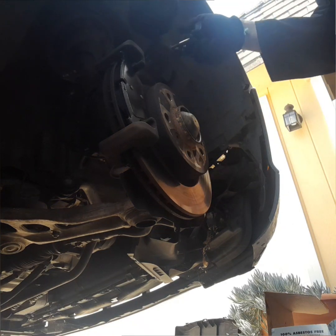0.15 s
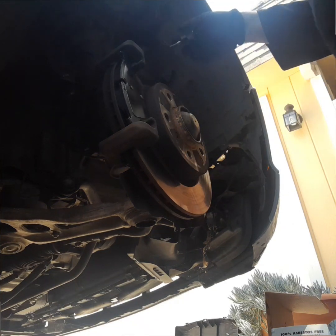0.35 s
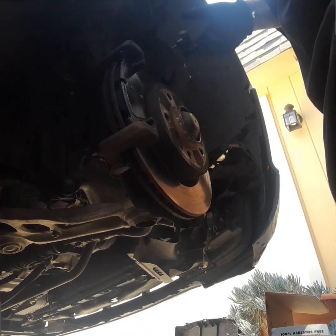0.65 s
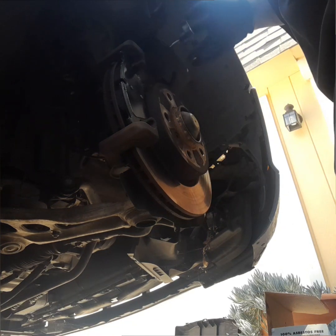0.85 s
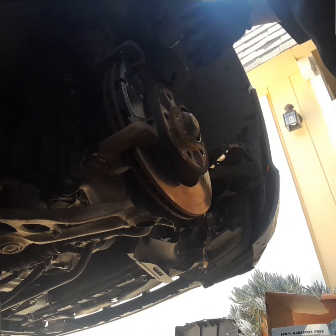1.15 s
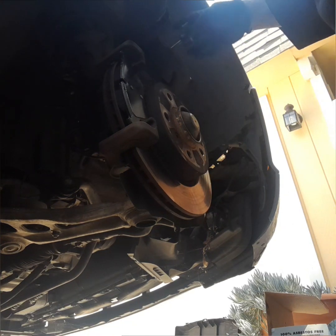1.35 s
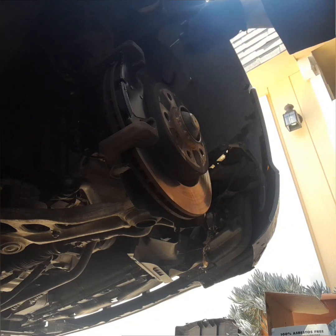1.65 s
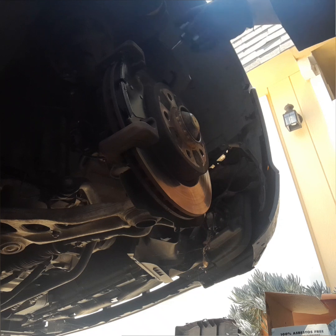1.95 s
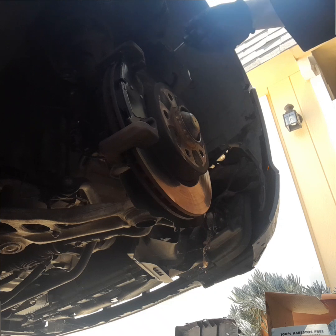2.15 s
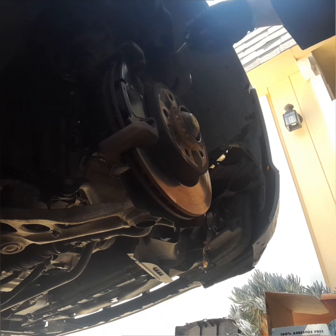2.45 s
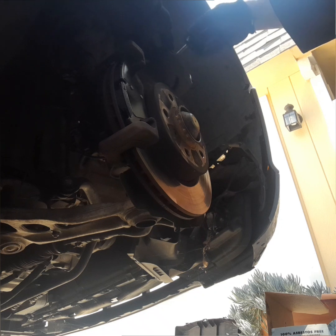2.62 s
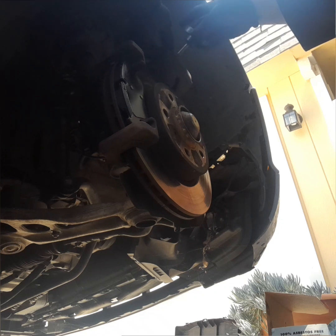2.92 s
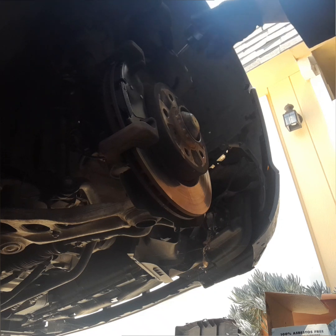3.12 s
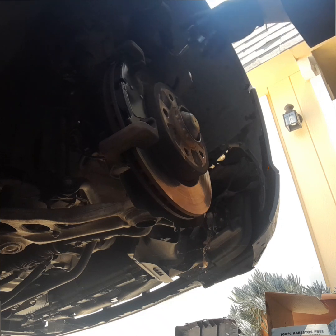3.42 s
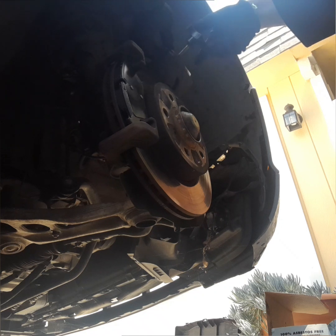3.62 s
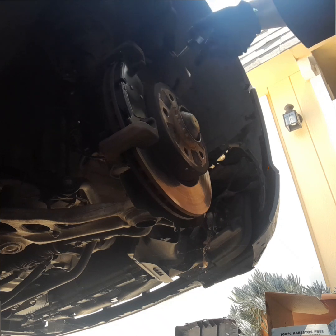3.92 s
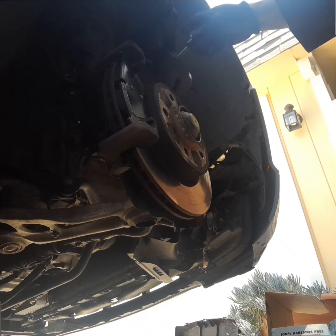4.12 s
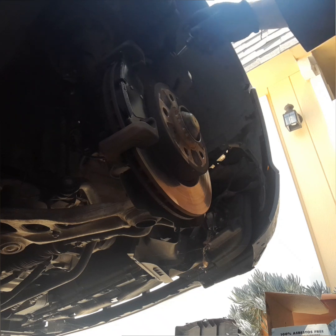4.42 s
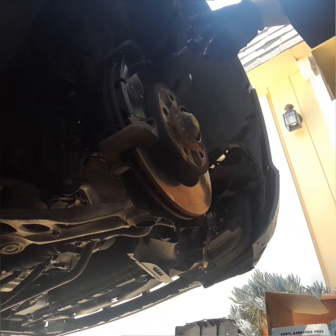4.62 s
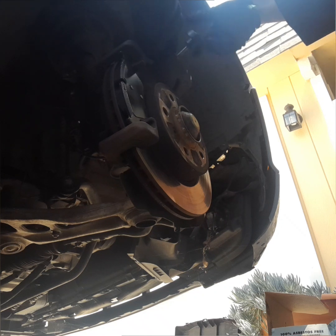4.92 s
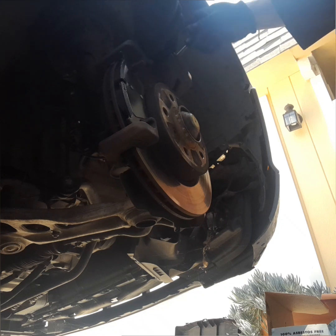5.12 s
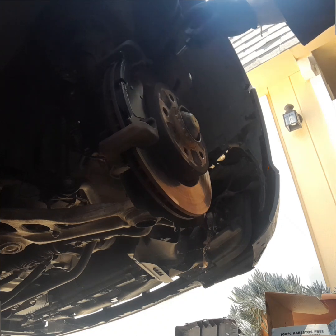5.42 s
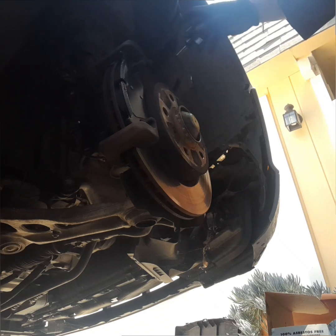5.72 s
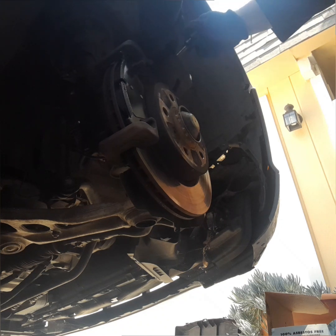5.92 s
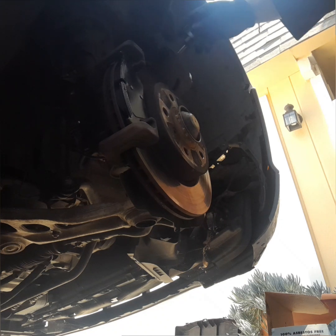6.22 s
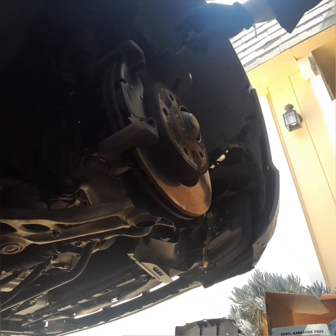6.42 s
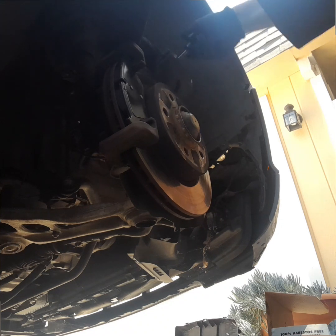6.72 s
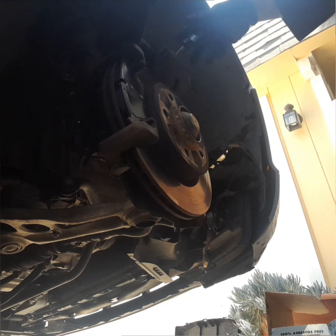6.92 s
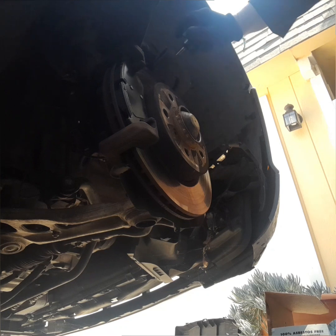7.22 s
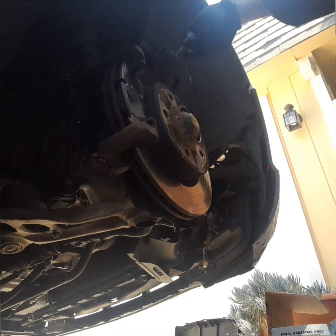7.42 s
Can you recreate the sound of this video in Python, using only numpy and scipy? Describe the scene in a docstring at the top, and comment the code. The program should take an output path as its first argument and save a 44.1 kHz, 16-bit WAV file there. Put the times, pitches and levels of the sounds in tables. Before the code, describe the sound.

A close microphone by a car's front brake catches hands at work. A tool drags and rattles over the ground within the first second. Small dry steel clicks follow, some with faint pad chatter, leading to a very loud sharp crack and several strong follow-ups. Later clicks weaken and loose metal knocks dully. Low outdoor rumble and soft sleeve rustling lie beneath; no speech.

```python
"""Work on a car's front brake, heard from under the wheel arch, outdoors, over a low rumble throughout. Faint
caliper clicks and a sleeve brush come first; at 0.4-0.8 s a steel tool scrapes and clatters on the ground.
Caliper clicks, each a coloured noise crack plus decaying modes, peak in a hard pair at 3.3 s and then thin out.
Each shakes suspension and panels (low modes); pads chatter by filtered noise from 1.8 to 5.5 s. Hollow clunks
of the body panels, one at 0.3 s, gather from 4.9 s to the end; sleeves rustle as grainy noise."""
import sys
import numpy as np
from scipy import signal
from scipy.fft import rfft, irfft, next_fast_len
from scipy.io import wavfile
from scipy.ndimage import map_coordinates

SR = 44100
rng = np.random.default_rng(int(sys.argv[2]) if len(sys.argv) > 2 else 0)


def transcribe(signal):
    """Save signal, clipped to [-1, 1], as a 16-bit WAV file at the path in sys.argv[1]."""
    frames = np.atleast_2d(signal).T
    limited = np.clip(frames, -1, 1)
    pcm = np.round(limited * 32767).astype(np.int16)
    wavfile.write(sys.argv[1], SR, pcm)


N = 332955

# Levels in the tables are relative; t60 and rise are nominal.
# caliper contacts: t/s, click level/dB, low clank re click/dB, mid clink re click/dB, t60/s
CONTACTS = [(0.0887, -39, -6.5, -10, 0.11), (0.3147, -27.5, -5.5, -2, 0.073),
            (0.431, -27.5, -18, -21, 0.024), (0.7709, -26, -12, -7.5, 0.024),
            (0.7939, -27.5, -34, -27, 0.053), (0.842, -32.5, -7.5, -11, .044),
            (0.9011, -45, -4.5, -7, 0.022), (1.3013, -33, -23.5, -4.5, 0.022),
            (1.7505, -37, -28, -35.5, 0.053), (1.8079, -29.5, -28.5, -26.5, 0.06),
            (1.8344, -40, -21, -20.5, 0.031), (2.0144, -30, -30, -22.5, .039),
            (2.076, -27.5, -25.5, -22.5, 0.031), (2.2525, -41, -31, -22.5, 0.049),
            (2.408, -20.5, -21.5, -18, 0.053), (2.7205, -22, -16.5, -14, 0.061),
            (2.768, -44.5, -11, -20, 0.16), (3.0207, -37, -18, -12, 0.093),
            (3.0604, -39, -12, -16.5, 0.071), (3.0757, -37, -22, -13, .042), (3.3129, -5, -26, -12, 0.061),
            (3.3207, -12.5, -20.5, -20, 0.08), (3.6126, -12, -20, -12.5, 0.072),
            (3.6686, -24.5, -15.5, -11, .055), (3.8923, -28.5, -12.5, -16, 0.087),
            (4.1616, -25, -20, -26, .07), (4.2727, -21, -15, -6.5, 0.068),
            (4.4907, -43.5, -20, -27.5, 0.054), (4.7943, -17.5, -33.5, -27.5, 0.057),
            (4.8101, -36.5, -9.5, -17, 0.13), (4.8464, -37.5, -7, -12.5, 0.077),
            (4.8623, -15, -28.5, -21.5, 0.046), (5.034, -36.5, -28, -26.5, .037),
            (5.1361, -43, -17.5, -22, 0.17), (5.2641, -36, -9, -24, 0.059),
            (5.2919, -43.5, -13, -10.5, 0.058), (5.457, -44, -3, -10, 0.088),
            (5.8539, -54, -14, -25, 0.072), (6.147, -45, -30.5, -38, .068),
            (6.2164, -43, -28.5, -15, 0.089), (6.4265, -45.5, -24.5, -16, 0.075),
            (6.4593, -39.5, -29.5, -20, .057), (6.5953, -47.5, 4, -3, 0.084), (7.438, -55, -15, -3, 0.13)]
# caliper and disc modes: f/Hz, level/dB, t60/s
CALIPER_MODES = [(403, -14, .16), (834, -17, .32), (880, -18, .2), (1130, -9, .17), (1370, -12, .12),
                 (1435, -10, .14), (1577, -8, .18), (1617, -11, .17), (1760, -10, .13), (2010, -14, .13),
                 (2580, -12, .13), (2790, -14, .13), (3380, -16, .12), (3840, -11, .13), (4670, -12, .12),
                 (6280, -10, .1), (7550, -11, .1)]
# steel contact spectrum: f/Hz, density level/dB
STEEL_SPECTRUM = [(150, -3.5), (400, 1.5), (600, -5.5), (800, 1), (1000, -4.5), (1500, 2), (2700, 3),
                  (3600, -5), (4600, 2.5), (7400, -1), (9500, -5), (11700, -18.5), (13500, -13.5),
                  (15800, -12.5)]
# left-right lean of the brake: f/Hz, L-R level/dB
BRAKE_LEAN = [(100, -2.5), (700, 3.5), (1300, -3), (4400, 4), (8000, -0.5), (15000, 4)]
# thin spring clip modes: f/Hz, level/dB, t60/s
SPRING_MODES = [(14992, 0, .27), (15040, -8, .14)]
# clunks of the body panels: t/s, clunk level/dB, suspension boom level/dB, rise/s
CLUNKS = [(0.319, -40.5, -53, .003), (4.859, -45.5, -50.5, 0.0045), (6.204, -63, -42, 0.0049),
          (6.526, -51, -34, 0.0076), (6.589, -34.5, -33, 0.0043), (6.616, -39.5, -32.5, 0.0014),
          (6.81, -44.5, -42, 0.0087), (6.845, -37, -41, 0.0025), (7.441, -47, -32, 0.004),
          (7.488, -57, -34.5, 0.0037)]
# hollow modes of the body panels: f/Hz, level/dB, t60/s
HOLLOW_MODES = [(280, -3, .17), (400, -7, .14), (665, -1, .15), (720, -5, .11), (770, 0, .17),
                (835, -3, .24), (900, -5, .12), (990, -6, .11), (1146, -2, .17), (1240, -9, .1),
                (1630, -11, .13)]
# clunk rattle spectrum: f/Hz, density level/dB
RATTLE_SPECTRUM = [(150, -2.5), (350, 3.5), (520, -5), (750, 5.5), (1150, -2.5), (1400, -9.5), (1700, -12),
                   (2800, -23), (6000, -37)]
# pads chattering as they slide: t/s, level/dB, length/s
SLIDES = [(1.843, -67, .15), (2.263, -61, 0.12), (4.2, -62.5, 0.11), (5.038, -55, 0.023),
          (5.139, -43, 0.012), (5.189, -55, 0.027), (5.283, -48.5, 0.033), (5.465, -38.5, 0.011)]
# pad backing-plate modes: f/Hz, level/dB, t60/s
PAD_MODES = [(1139, 0, 0.068), (1361, -5, 0.027)]
# suspension and body-panel modes: f/Hz, level/dB, t60/s
CHASSIS_MODES = [(92, -11, .35), (120, -6, .34), (144, -1, .38), (188, -15, .25), (208, -16, .22),
                 (280, -13, .2), (400, -11, .18)]
# tool dragged over the ground: t/s, friction level/dB, brightness/dB
DRAG = [(0.44, -54.5, -1), (0.53, -43.5, -3), (0.538, -35.5, -16), (0.624, -18, -2), (0.644, -23.5, 2.5),
        (0.722, -22, -5), (0.74, -22.5, -5.5), (0.756, -40.5, 0.5), (0.77, -43, -5.5)]
# tool knocks on the ground: t/s, clink level/dB, knock level/dB
BUMPS = [(.539, -29.5, -44), (.548, -30, -29.5), (0.578, -23.5, -36.5), (0.598, -17, -32),
         (0.617, -21.5, -31), (0.6249, -15.5, -24.5), (0.633, -23.5, -12.5), (.654, -18, -32.5),
         (0.6818, -19.5, -14), (0.7023, -11, -21), (0.717, -10.5, -13), (.752, -42.5, -22.5)]
# ringing modes of the tool: f/Hz, level/dB, t60/s
TOOL_MODES = [(2498, -4, .06), (2789, -9, .05), (3510, -6, .08), (4180, -3, .07), (4320, -2, .05),
              (4535, -1, .06), (5823, 0, .08), (6280, 0, .07), (7703, -2, .1), (8096, -6, .12),
              (8274, -1, .06), (8753, -2, .08), (9353, 1, .13), (10578, -1, .11), (11280, -5, .07),
              (12230, -2, .07), (14625, -3, .11)]
# low bending modes of the tool: f/Hz, level/dB, t60/s
BENDING_MODES = [(268, -8, .2), (531, -2, .15), (554, -2, .15), (609, -2, .14), (645, 0, .15),
                 (666, 0, .15), (715, -2, .1)]
# grit under the tool, spectrum: f/Hz, density level/dB
GRIT_SPECTRUM = [(120, -35.5), (200, -5.5), (359, -6.5), (644, -13.5), (1220, -3.5), (3460, -2.5),
                 (4900, -9), (6000, -10.5), (6810, -16.5), (7890, -11), (10000, -22.5), (14700, -17),
                 (15800, -35.5)]
# fine grit hiss, spectrum: f/Hz, density level/dB
HISS_SPECTRUM = [(3500, -30), (5200, -10.5), (6400, -0.5), (8500, -4), (10500, -4.5), (15000, -5.5)]
# ground knock spectrum: f/Hz, density level/dB
GROUND_SPECTRUM = [(50, -10), (90, -7.5), (170, -9), (260, -0.5), (400, -9), (540, 7.5), (670, -2),
                   (900, 0.5), (1500, -10), (3000, -24), (8000, -73.5)]
# left-right lean of the tool: f/Hz, L-R level/dB
TOOL_LEAN = [(100, 3.5), (600, 6.5), (1300, 3), (4000, 4), (8000, 8.5), (15000, 11)]
# wheel-arch reverberation: f/Hz, t60/s
ARCH_DECAY = [(150, 0.71), (800, 0.16), (2000, 0.19), (6000, 0.04), (15000, 0.11)]
# background course: t/s, rumble level/dB, handling level/dB
BACKGROUND = [(0.0, -67.5, -76.5), (0.08, -58, -76.5), (0.48, -50, -51), (0.69, -44.5, -48.5),
              (0.88, -59.5, -59), (1.49, -71.5, -81), (2.25, -54.5, -64), (3.11, -54, -76),
              (3.59, -54, -64), (4.22, -53, -78), (4.33, -53, -72.5), (4.84, -53, -79), (5.03, -51.5, -67),
              (5.74, -52.5, -70), (6.14, -51, -69.5), (6.75, -46.5, -58), (7.04, -51.5, -77),
              (7.55, -55, -73.5)]
# a sleeve brushes past: t/s, level/dB, length/s
BRUSHES = [(0.284, -52, 0.065), (1.082, -72.5, 0.026), (1.194, -49, 0.028), (1.8, -60.5, .04),
           (3.027, -60, 0.032), (4.575, -64.5, 0.054), (6.387, -69.5, 0.23), (6.87, -64.5, 0.15),
           (6.955, -55.5, 0.017)]
# outdoor rumble spectrum: f/Hz, density level/dB
RUMBLE_SPECTRUM = [(15, -41), (25, -14), (59, 4.5), (108, -4), (141, -0.5), (167, -7), (200, -5),
                   (226, -9.5), (291, -12.5), (334, -19.5), (406, -21), (700, -37.5), (910, -54.5),
                   (1540, -120)]
# handling shuffle spectrum: f/Hz, density level/dB
SHUFFLE_SPECTRUM = [(200, -6.5), (400, -4), (800, -1), (1000, -12), (1150, -4.5), (1500, -15.5),
                    (2500, -21), (5000, -36)]
# sleeve rustle spectrum: f/Hz, density level/dB
SLEEVE_SPECTRUM = [(1000, -9), (2500, -1), (4500, -4), (7600, 1), (10500, -6.5), (15500, -2.5)]
# left-right likeness: f/Hz, correlation
ALIKE = [(60, .92), (150, .93), (350, .68), (700, .42), (1300, -.5), (2500, -.12), (6000, -.08),
         (15000, .05)]

# contacts with more clank than BLUNT_FROM_DB excite the lower mode cluster
BLUNT_FROM_DB, BLUNT_RING_HZ, SHARP_RING_HZ = -12, 2350, 7400
RING_DB, RING_HALF_WIDTH_HZ, RING_SCATTER = 5.5, 260, 0.032  # cluster lift; scatter is relative
EDGE_DB, EDGE_DB_PER_DB = 8, 0.26  # 13 kHz edge at 0 dB clink; growth with clink
RATTLE_KNOTS_PER_S, RATTLE_DEPTH_DB = 170, 2.5  # loose parts chatter in the tail of each blow
TICK_DB, TICK_HALF_RANGE_DB = 23, 1  # stray ticks of loose parts, re sleeve rustle
TICK_CLANK_DB, TICK_CLINK_DB, TICK_T60_S = -19, -22.5, 0.057
SPRING_DB, SPRING_DB_PER_DB = -24.5, 2.2  # ring at the hardest blow; loss per dB softer
BLOW_BOOM_DB, BUMP_BOOM_DB, CLUNK_BOOM_DB = -22, -23, 2.5  # re click, tool knock, CLUNKS boom column
BOOM_LAG_S = 0.004
DRAG_DB, DRAG_BRIGHT_DB, HISS_DB = -2.5, 1.5, -3  # offsets to DRAG: grit, brightness, hiss
DRAG_ATTACK_S, DRAG_LIFT_S, DRAG_RELEASE_S = 0.015, 0.738, 0.017  # ramp, lift-off time, time constant
SLIP_KNOTS_PER_S, SLIP_DEPTH_DB = 160, 2.5  # the tool catches and lets go unevenly
RUMBLE_DB, SHUFFLE_DB = 2, 2  # offsets to BACKGROUND
SLEEVE_DB, SLEEVE_DB_PER_DB = -72.5, 0.65  # rustle at average handling; growth with handling
BRUSH_BODY_DB = -4  # shuffle of a brushing sleeve, re its rustle
SETTLE_RISE_S, SETTLE_T60_S, SETTLE_DB_PER_DB = 0.04, 0.33, 0.53  # hands and parts settle after a blow
SETTLE_SHUFFLE_DB, SETTLE_SLEEVE_DB = -58.5, -57.5  # after the hardest blow
TOP_HZ = 15850


def caliper():
    """Each contact makes a dense short steel crack, a rattling tail and longer modes; the arch answers."""
    cracks, rings = np.zeros((2, N)), np.zeros((2, N))
    t = np.arange(SR // 3) / SR
    casting = uneven(noise(STEEL_SPECTRUM, len(t)), depth_db=6.5, spacing_hz=84.6)  # shared by all blows
    chatter = unit(amp(RATTLE_DEPTH_DB * wobble(RATTLE_KNOTS_PER_S)))
    for s, db, clank_db, clink_db, t60_s in CONTACTS + stray_ticks(count=18):
        # blunt blows are strong in the low modes, sharp ones in the high modes
        colour = [(200, clank_db + 18), (1500, clank_db + 14.5), (3500, clink_db + 13.0),
                  (7000, -1.3), (13000, EDGE_DB + EDGE_DB_PER_DB * clink_db)]
        # the point of contact favours one cluster of modes
        centre_hz = BLUNT_RING_HZ if clank_db > BLUNT_FROM_DB else SHARP_RING_HZ
        ring_hz = centre_hz * np.exp(RING_SCATTER * rng.standard_normal())

        def contact_gain(hz):
            """Colour plus the favoured cluster."""
            cluster_db = RING_DB / (1 + ((hz - ring_hz) / RING_HALF_WIDTH_HZ) ** 2)
            return amp(along(colour, hz) + cluster_db)

        own = uneven(noise(STEEL_SPECTRUM, len(t)), depth_db=5.0, spacing_hz=96.3)
        crowd = filtered(0.91 * casting + 0.8 * own, contact_gain)
        modes = [(hz, level_db + along(colour, hz), life_s) for hz, level_db, life_s in CALIPER_MODES]
        tones = ring(modes, t, scatter_db=3.5) * (1 - np.exp(-t / 0.0028))
        crack = crowd * fade(t, 0.0039, 0.56 * t60_s)
        add(cracks, s - 0.0008, amp(db - 9.5) * crack)
        freedom = (t60_s / 0.068) ** 0.79  # a part held tight dies fast and hardly rings on
        chatter_here = np.roll(chatter, -round(s * SR))[:len(t)]
        rattle = amp(-6.5) * crowd * fade(t, 0.037, 1.44 * t60_s) * chatter_here
        add(rings, s - 0.0008, freedom * amp(db - 11.5) * (rattle + tones))
    return placed(cracks + rings, BRAKE_LEAN) + amp(-13) * arch(rings)


def stray_ticks(count):
    """Faint contacts of loose parts at random times, stronger while the hands are busy."""
    sleeve_db = rustle_db()
    ticks = []
    for when, size in rng.random((count, 2)):
        db = sleeve_db[int(when * N)] + TICK_DB + TICK_HALF_RANGE_DB * (2 * size - 1)
        ticks.append((when * N / SR, db, TICK_CLANK_DB, TICK_CLINK_DB, TICK_T60_S))
    return ticks


def spring():
    """A thin clip rings near 15 kHz; its level falls faster than that of the blow."""
    out, t = np.zeros((2, N)), np.arange(SR // 3) / SR
    hardest_db = max(db for _, db, *_ in CONTACTS)
    for s, db, *_ in CONTACTS:
        level_db = SPRING_DB + SPRING_DB_PER_DB * (db - hardest_db)
        tones = ring(SPRING_MODES, t, scatter_db=0) * (1 - np.exp(-t / 0.003))
        add(out, s, amp(level_db) * tones)
    return out


def clunks():
    """Blunt knocks wake only the low, hollow modes, with a short noise rattle."""
    out, t = np.zeros((2, N)), np.arange(SR // 3) / SR
    for s, db, _, rise_s in CLUNKS:
        tones = ring(HOLLOW_MODES, t, scatter_db=3.0) * (1 - np.exp(-t / rise_s))
        rattle = uneven(noise(RATTLE_SPECTRUM, len(t)), depth_db=4, spacing_hz=50) * fade(t, rise_s, 0.17)
        add(out, s, amp(db) * (tones + amp(-3.5) * rattle))
    return out + amp(-6.5) * arch(out)


def pads():
    """Stick and slip, as a swelling noise force, makes the pads' backing plates sound."""
    pressure = sum(swell(s, db, length_s) for s, db, length_s in SLIDES)
    return resonate(pressure * rng.standard_normal((1, N)), PAD_MODES, scatter_db=0)


def chassis():
    """Each caliper click, tool knock and clunk makes suspension and panels boom in proportion."""
    out, t = np.zeros((2, N)), np.arange(SR // 2) / SR
    blows = [(s, db + BLOW_BOOM_DB) for s, db, *_ in CONTACTS]
    blows += [(s, db + BUMP_BOOM_DB) for s, _, db in BUMPS]
    blows += [(s, db + CLUNK_BOOM_DB) for s, _, db, _ in CLUNKS]
    for s, db in blows:
        boom = ring(CHASSIS_MODES, t, scatter_db=2.5) * (1 - np.exp(-t / 0.0046))
        add(out, s + BOOM_LAG_S, amp(db) * boom)
    return out * amp([[0.7], [-0.7]])


def tool():
    """Grit catches and slips under the dragged tool; slips ring its steel, bumps make it bend."""
    friction_db, bright_db = curves(DRAG)
    now, t = np.arange(N) / SR, np.arange(SR // 4) / SR
    bite = np.clip((now - DRAG[0][0]) / DRAG_ATTACK_S + 1, 0, 1)
    release = np.exp(-np.maximum(now - DRAG_LIFT_S, 0) / DRAG_RELEASE_S)
    touching = bite * release * unit(amp(SLIP_DEPTH_DB * wobble(SLIP_KNOTS_PER_S)))
    grit = noise(GRIT_SPECTRUM, N)
    fine = filtered(grit, lambda hz: 1 / (1 + (5000 / (hz + 1)) ** 4))  # above about 5 kHz
    coloured = grit + (amp(bright_db + DRAG_BRIGHT_DB) - 1) * fine
    grain = unit(amp(2.2 * wobble(800)))
    force = coloured * touching * amp(friction_db + DRAG_DB) * grain
    knocks = np.zeros((2, N))
    for s, clink_db, knock_db in BUMPS:
        clink = uneven(noise(GRIT_SPECTRUM, len(t)), depth_db=4.5, spacing_hz=203.0)
        add(force, s, amp(clink_db) * clink * fade(t, 0.00035, 0.043))
        knock = noise(GROUND_SPECTRUM, len(t)) * fade(t, 0.00033, 0.037)
        add(knocks, s, amp(knock_db - 3.5) * knock)
    hiss = amp(friction_db + bright_db + HISS_DB) * touching * noise(HISS_SPECTRUM, N)
    clatter = amp(-1) * force + amp(-2.5) * resonate(force, TOOL_MODES) + hiss
    bending = amp(-14.5) * resonate(knocks, BENDING_MODES)
    return placed(clatter + knocks + bending, TOOL_LEAN)


def arch(x):
    """The wheel arch and ground answer with a noise tail whose decay time depends on frequency."""
    hz, t, z = signal.stft(noise([(100, 0), (15000, 0.003)], SR // 2), SR, nperseg=256)
    decay = np.exp(-np.log(1000) * t / along(ARCH_DECAY, hz)[:, None])
    tail = signal.istft(z * decay, SR, nperseg=256)[1]
    tail = tail * (1 - np.exp(-np.arange(tail.shape[1]) / SR / 0.008))
    return signal.fftconvolve(x, tail / np.linalg.norm(tail[0]), axes=1)[:, :N]


def background():
    """Low outdoor rumble, soft shuffling and grainy sleeve rustle, all as shaped noise."""
    rumble_db, handling_db = curves(BACKGROUND)
    unsteady_db = 1.5 * wobble(12)
    rumble = amp(rumble_db + RUMBLE_DB + unsteady_db) * noise(RUMBLE_SPECTRUM, N)
    shifting = amp(SETTLE_SHUFFLE_DB) * settling([(s, db + clank_db) for s, db, clank_db, *_ in CONTACTS])
    brushing = sum(swell(s, db, length_s) for s, db, length_s in BRUSHES)
    moving = np.hypot(amp(handling_db + SHUFFLE_DB), shifting + amp(BRUSH_BODY_DB) * brushing)
    shuffle = moving * amp(1.0 * wobble(33)) * noise(SHUFFLE_SPECTRUM, N)
    recoil = amp(SETTLE_SLEEVE_DB) * settling([(s, db) for s, db, *_ in CONTACTS])
    rubbing = np.hypot(amp(rustle_db()), recoil) + brushing
    grain = amp(2.0 * wobble(30) + 1.7 * wobble(400))
    sleeve = rubbing * grain * noise(SLEEVE_SPECTRUM, N)
    return (rumble + shuffle + sleeve) * amp([[0.5], [-0.5]])


def rustle_db():
    """Sleeves rustle more as the handling gets busier."""
    _, handling_db = curves(BACKGROUND)
    return SLEEVE_DB + SLEEVE_DB_PER_DB * (handling_db - handling_db.mean())


def settling(blows):
    """Swells of movement after (s, dB) blows, summed in power; a lone hardest blow peaks at 1."""
    power, t = np.zeros((1, N)), np.arange(SR) / SR
    hardest_db = max(db for _, db in blows)
    for s, db in blows:
        movement = amp(SETTLE_DB_PER_DB * (db - hardest_db)) * fade(t, SETTLE_RISE_S, SETTLE_T60_S)
        add(power, s, movement[None] ** 2)
    return np.sqrt(power[0])


def ring(modes, t, scatter_db):
    """Decaying modes at new strengths; L-R phase gap follows ALIKE, its sign random."""
    hz, db, t60_s = np.transpose(modes)[:, :, None]
    apart = np.arccos(np.clip(along(ALIKE, hz), -1, 1)) * rng.choice([-1, 1], hz.shape) / 2
    phase = 2 * np.pi * (hz * t + rng.random(hz.shape))
    strength = amp(db + scatter_db * rng.standard_normal(hz.shape))
    size = strength * np.exp(-np.log(1000) * t / t60_s)
    return np.array([(size * np.sin(phase + turn)).sum(0) for turn in (apart, -apart)])


def resonate(force, modes, scatter_db=1.0):
    """Force played through modes, the response scaled to unit energy."""
    body = ring(modes, np.arange(SR // 3) / SR, scatter_db)
    return signal.fftconvolve(force, body / np.linalg.norm(body[0]), axes=1)[:, :N]


def uneven(x, depth_db, spacing_hz):
    """x through a crowd of random peaks and dips in frequency, at the same overall level."""
    strengths = rng.standard_normal(1024)
    knots = np.arange(len(strengths))
    y = filtered(x, lambda hz: amp(depth_db * np.interp(hz / spacing_hz, knots, strengths)))
    return y * x.std() / y.std()


def noise(spectrum, size):
    """Stereo noise of rms 1 with the left-right correlation of ALIKE."""
    def mid_side_gain(hz):
        """Split of the spectrum between mid and side."""
        turn = np.arccos(np.clip(along(ALIKE, hz), -1, 1)) / 2
        return amp(along(spectrum, hz)) * [np.cos(turn), np.sin(turn)]

    mid, side = filtered(rng.standard_normal((2, size)), mid_side_gain)
    return unit(np.array([mid + side, mid - side]))


def placed(x, lean):
    """Lean a sound left or right, band by band."""
    return filtered(x, lambda hz: amp(np.outer([0.5, -0.5], along(lean, hz))))


def filtered(x, response):
    """x times a response of frequency."""
    n = x.shape[-1]
    m = next_fast_len(n + 4096)
    return irfft(rfft(x, m) * response(np.fft.rfftfreq(m, 1 / SR)), m)[..., :n]


def fade(t, rise_s, t60_s):
    """Quick swell and exponential decay, peak 1."""
    shape = (1 - np.exp(-t / rise_s)) * np.exp(-np.log(1000) * t / t60_s)
    return shape / shape.max()


def swell(s, db, length_s):
    """Bell-shaped gain around time s; length_s is two standard deviations."""
    return amp(db) * np.exp(-2 * ((np.arange(N) / SR - s) / length_s) ** 2)


def wobble(knots_per_s):
    """Smooth random curve."""
    knots = rng.standard_normal(int(N * knots_per_s / SR) + 4)
    return map_coordinates(knots, [np.arange(N) * knots_per_s / SR])


def curves(rows):
    """One value per sample for each column after the time."""
    s, *columns = np.transpose(rows)
    return [np.interp(np.arange(N) / SR, s, column) for column in columns]


def along(points, hz):
    """(Hz, value) points interpolated on a log axis."""
    f, v = np.transpose(points)
    return np.interp(np.log(hz + 1), np.log(f + 1), v)


def amp(db):
    """Decibels to gain."""
    return 10 ** (np.asarray(db) / 20)


def unit(x):
    """Scaled to rms 1."""
    return x / np.sqrt(np.mean(x ** 2) + 1e-20)


def add(track, s, sound):
    """Mix a sound into the track at time s."""
    part = track[:, max(round(s * SR), 0):][:, :sound.shape[1]]
    part += sound[:, :part.shape[1]]


def scene():
    """Brake and tool with their echoes, over the background."""
    dragged = tool()
    brake = caliper() + spring() + clunks() + pads() + chassis()
    return brake + dragged + amp(-20.0) * arch(dragged) + background()


def record(dry):
    """Cut the deepest bass, round off peaks near full scale, remove all above the band limit."""
    thinned = signal.sosfilt(signal.butter(4, 38, "high", fs=SR, output="sos"), dry)
    rounded = thinned / (1 + np.abs(thinned / 0.9) ** 6) ** (1 / 6)
    return filtered(rounded, lambda hz: np.clip((TOP_HZ - hz) / 200 + 0.5, 0, 1))


dry = scene()
out = record(dry)
transcribe(out)
```